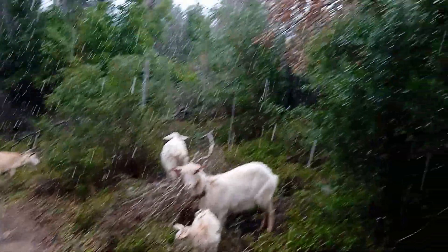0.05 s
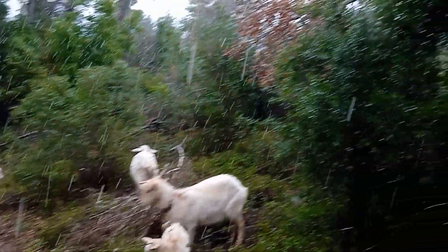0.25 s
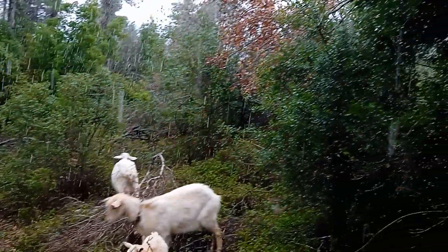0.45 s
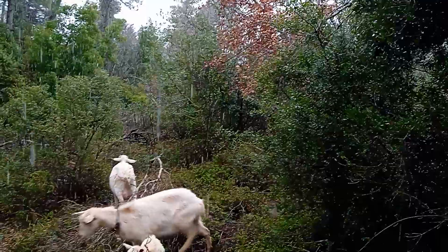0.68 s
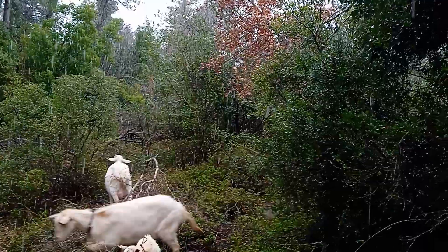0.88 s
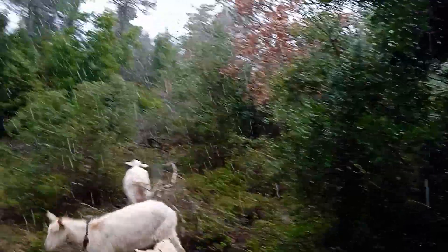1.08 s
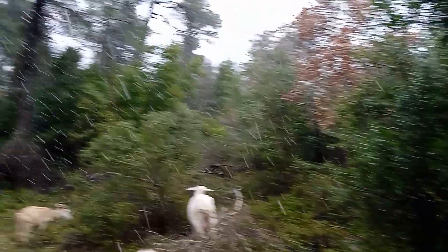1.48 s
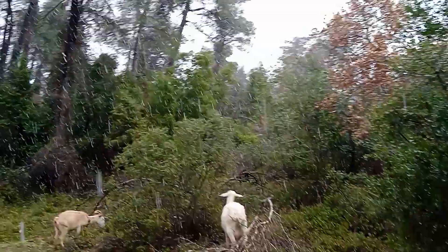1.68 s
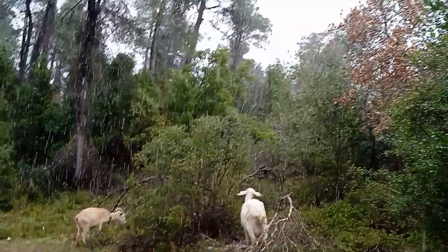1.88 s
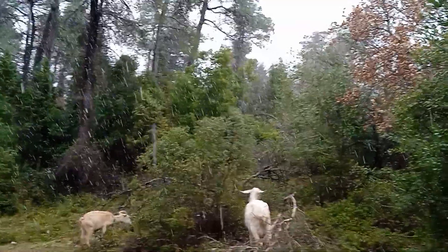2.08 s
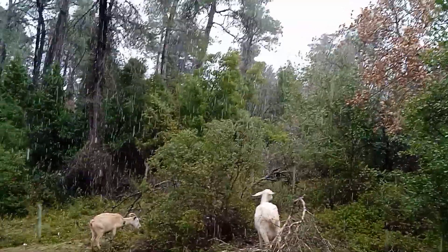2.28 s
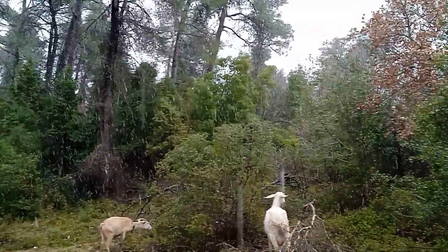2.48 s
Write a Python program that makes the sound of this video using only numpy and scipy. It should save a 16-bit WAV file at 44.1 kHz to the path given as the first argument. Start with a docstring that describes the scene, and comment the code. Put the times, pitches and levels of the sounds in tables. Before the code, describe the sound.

A goat's sheet-metal bell clanks irregularly near the microphone, joined by a higher bell and fainter ones. Outdoors, under lightly pattering drops, the goats rustle the brush, followed by hoof taps, a scuffing step and snapping twigs.

```python
"""Goats browsing at a forest edge, on one microphone in the open air. Over a light patter on the leaves,
a small bell clinks and the nearest goat's sheet-metal bell starts clanking, quick and uneven. A deeper
bell sounds faintly from afar, the animals rustle the brush and a third bell rings on softly. From about
one second in, drops and hooves tap close by, the small bell answers again, one footstep scuffs the
ground and twigs snap."""
import sys
import numpy as np
from scipy import signal
from scipy.fft import rfft, irfft
from scipy.io import wavfile

SR = 44100
rng = np.random.default_rng(int(sys.argv[2]) if len(sys.argv) > 2 else 0)


def dump_mix(stems):
    """Bounce the given channels to the path in sys.argv[1] as a 16-bit WAV at rate SR."""
    frames = np.atleast_2d(stems).T  # one column per channel
    limited = np.clip(frames, -1, 1)  # hard clip at full scale
    pcm = np.round(limited * 32767).astype(np.int16)
    wavfile.write(sys.argv[1], SR, pcm)


N = 116865
TIME = np.arange(N) / SR
FLUTTER, FLUTTER_PER_S = 0.5, 90  # the modes flutter as a bell swings
SCATTER_DB = 3.5  # spread of an upper mode's level from blow to blow


def undb(db):
    """Decibels to gain."""
    return 10 ** (np.asarray(db) / 20)


def colour(x, spectrum):
    """Filter x by a curve of (freq_hz, level_db) points and scale it to rms 1."""
    hz, db = np.array(spectrum).T
    bin_hz = np.maximum(np.arange(len(x) // 2 + 1) * SR / len(x), 1)
    gain = undb(np.interp(np.log(bin_hz), np.log(hz), db))
    shaped = irfft(rfft(x) * gain, len(x))
    return shaped / shaped.std()


def hiss(spectrum):
    """Coloured noise."""
    return colour(rng.standard_normal(N), spectrum)


def grains(spectrum, per_s, spread_db):
    """Dense tiny clicks of unequal size."""
    sizes = undb(spread_db * np.minimum(rng.exponential(size=N), 5))
    hits = rng.random(N) < per_s / SR
    return colour(hits * sizes * rng.choice([-1, 1], N), spectrum)


def swell(start, rise_s, fall_s, hold_s=0):
    """Envelope: linear attack, hold, exponential release."""
    age = TIME - start
    return np.clip(age / rise_s, 0, 1) * np.exp(-np.maximum(age - rise_s - hold_s, 0) / fall_s)


def add(out, start, sound):
    """Mix a sound in at a time."""
    i = max(int(start * SR), 0)
    out[i:i + len(sound)] += sound[:N - i]


def wobble(per_s, t):
    """Smooth random swing of amplitude and phase, as a complex signal with rms near 1."""
    knots = np.arange(int(t[-1] * per_s) + 2) / per_s
    real, imag = rng.standard_normal((2, len(t)))[:, :len(knots)]
    return np.interp(t, knots, real + 1j * imag) * np.sqrt(3 / 4)


def ring(modes, t60_s, rise_s=0.0015, scatter_db=0, flutter=0):
    """Decaying (pitch_hz, level_db) modes; each blow lands elsewhere, so detunes and can reweight them."""
    out, t = 0, TIME[:SR // 2]
    for hz, db in modes:
        gain = undb(db + scatter_db * rng.standard_normal())
        swing = 1 + flutter * wobble(FLUTTER_PER_S, t)
        detuned_hz = hz * (1 + 0.0035 * rng.standard_normal())
        out = out + np.imag(gain * swing * np.exp(2j * np.pi * (detuned_hz * t + rng.random())))
    return out * np.exp(-np.log(1000) * t / t60_s) * (1 - np.exp(-(t / rise_s) ** 2))


def soft_bell(blows, hz, t60_s):
    """One bell mode ringing on after each (start_s, level_db) blow."""
    out = np.zeros(N)
    for start, db in blows:
        add(out, start, undb(db) * ring([(hz, 0)], t60_s))
    return out


def leaf_patter():
    """Fine patter on the foliage over soft air noise, rising and falling together."""
    # spectrum of patter and air: freq_hz, level_db
    spectrum = [(25, -34), (70, -3), (170, -3), (3800, -10), (6300, -6.5), (9500, -21.5), (15000, -15.5)]
    # their loudness contour: time_s, level_db
    contour = [(.1, -64.5), (.35, -59), (.75, -58.5), (1.16, -64.5), (1.4, -61), (1.8, -68), (2.28, -69),
               (2.45, -65), (2.65, -68.5)]
    level = undb(np.interp(TIME, *np.array(contour).T))
    return level * (0.61 * hiss(spectrum) + 0.56 * grains(spectrum, per_s=1100, spread_db=6))


def small_bell():
    """A smaller, higher bell: each blow is a dry clink with a weak hum and bright upper modes."""
    # clapper blows: start_s, level_db, upper_relative_db, pitch_hz
    blows = [(0.097, -44, -28, 2390), (0.203, -41, -21, 2435), (1.170, -38.5, -31, 2150),
             (1.262, -35.5, -23, 2138), (1.413, -31.5, -5, 2118), (1.508, -28, -3.5, 2182),
             (1.645, -32.5, -11, 1993), (1.831, -34, -12, 2103), (2.136, -36, -16, 2113),
             (2.419, -33, -4, 2030), (2.545, -40.5, -11, 2056)]
    # upper modes: pitch_hz, level_db
    modes = [(5120, -19), (6600, -15), (7950, -21), (9100, -21), (10650, -25), (14900, -25)]
    out = np.zeros(N)
    for start, db, upper_db, hz in blows:
        clank = ring([(hz, 0)], t60_s=0.03, rise_s=0.00092)
        hum = ring([(max(hz, 2136), -11)], t60_s=0.14, rise_s=0.0013, flutter=2 * FLUTTER)
        upper = ring(modes, t60_s=0.094, rise_s=0.00092, scatter_db=SCATTER_DB, flutter=FLUTTER)
        add(out, start, undb(db) * (clank + hum + undb(upper_db) * upper))
    return out


def near_hum(t, t60_s, glancing, chatter_per_s):
    """The near bell's lowest mode: the clapper pulls it flat, chatters, then rests and chokes it."""
    hum_hz, sag_hz, chatter_flat_hz = 1738, 63.5, 70
    rise_s, chatter_s, choke_s, free_t60_s = 0.0021, 0.024, 0.13, 0.12
    chatter = np.exp(-t / chatter_s - 2j * np.pi * chatter_flat_hz * t) * wobble(chatter_per_s, t)
    # on a choked blow the clapper stays pressed to the wall and holds the hum flat for longer
    contact_s = 0.0035 + 0.025 * max(1 - t60_s / free_t60_s, 0)
    hz = hum_hz - sag_hz * np.exp(-t / contact_s)
    fade = np.exp(-np.log(1000) * t / t60_s) * (1 + 0.16 * wobble(FLUTTER_PER_S, t))
    tone = np.imag((fade + 0.5 * glancing * chatter) * np.exp(2j * np.pi * np.cumsum(hz) / SR))
    return tone * (1 - np.exp(-(t / rise_s) ** 2)) * np.exp(-(t / choke_s) ** 4)


def near_bell():
    """The sheet-metal bell by the microphone: each blow ticks, buzzes the rim and restarts the ring."""
    # clapper blows: start_s, hum_db, hum_t60_s, middle_db, top_db
    blows = [(0.134,-29,0.16,-57.5,-53.5), (.213,-30.5,0.31,-61,-53.5), (.236,-20.5,0.19,-41,-45),
             (.277,-25,0.17,-38.5,-48.5), (0.312,-24,0.18,-46,-51.5), (.345,-33,0.25,-43,-50.5),
             (0.412,-24,0.17,-48,-55), (0.451,-30,0.15,-45,-53), (.515,-24.5,0.14,-42,-48.5),
             (.551,-14.5,0.15,-38,-45.5), (.595,-36,0.13,-40.5,-51.5), (.64,-25,.18,-42.5,-52),
             (.674,-20,.04,-45,-49), (.688,-36,0.45,-51,-53), (.743,-33,0.19,-37,-55.5),
             (.779,-26.5,0.047,-45.5,-51), (.835,-26.5,0.075,-53.5,-51.5), (0.877,-29.5,0.15,-48.5,-52),
             (.944,-28,0.16,-43,-49.5), (.996,-27,0.29,-49.5,-56), (1.038,-28.5,0.14,-45.5,-51),
             (1.134,-33,.27,-67,-64.5), (1.184,-55,0.4,-42.5,-51.5), (1.286,-31.5,0.24,-53.5,-75),
             (1.308,-27,0.14,-44,-45), (1.343,-29,0.072,-52.5,-55), (1.433,-42.5,0.29,-52,-58),
             (1.529,-31.5,0.13,-51,-50.5), (1.556,-32.5,.41,-50.5,-53), (1.59,-21,0.087,-41.5,-49.5),
             (1.608,-30.5,.19,-55,-55), (1.695,-34.5,0.2,-48.5,-55), (1.711,-29.5,0.21,-43,-56.5),
             (1.875,-17,0.021,-43.5,-51), (1.888,-29,0.19,-46.5,-56), (2.021,-29.5,0.21,-49.5,-53),
             (2.169,-24,.13,-48,-53.5), (2.319,-29,.13,-58,-66.5), (2.3502,-30,0.31,-53,-57.5)]
    # three groups of upper modes, mostly split pairs: pitch_hz, level_db
    middle = [(4724, 0), (4810, -2.5)]
    high = [(8430, 0), (8790, -2)]
    top = [(12970, -1), (13345, -1), (14420, -10), (15120, -4), (15600, -12)]
    # the high pair gets louder as the goat turns: time_s, relative_to_top_db
    turn = [(1.3, -10), (1.35, 2)]
    # spectra of the clapper's tick and the rim's dense cluster of modes: freq_hz, level_db
    tick_spectrum = [(1000, -20.5), (1900, 22), (3800, -10), (5500, 9), (8000, -4.5)]
    rim_spectrum = [(6000, -19), (12300, -20), (13300, 2), (13800, -8), (15300, 0), (16300, -14)]
    # hard clicks where the clapper hits the rim squarely: start_s, level_db
    square_hits = [(0.515, -36), (0.7438, -36), (1.587, -36.5), (1.875, -43), (2.169, -45)]
    tick_relative_db, tick_s, buzz_relative_db, buzz_s = -11.5, 0.013, -7.5, 0.028
    hum_stop_s, upper_stop_s, chatter_per_s = 0.00059, 0.0082, 170
    out, ticks, buzz = np.zeros((3, N))
    t = TIME[:SR // 2]
    gaps = np.diff([row[0] for row in blows] + [N / SR])
    for (start, hum_db, hum_t60_s, middle_db, top_db), gap in zip(blows, gaps):
        # glancing blows favour the middle modes and chatter most
        glancing = min(undb((middle_db - hum_db) / 2), 1)
        hum = undb(hum_db) * near_hum(t, hum_t60_s, glancing, chatter_per_s)
        high_db = top_db + np.interp(start, *np.array(turn).T)
        groups = [(middle, middle_db, 0.34), (high, high_db, 0.28), (top, top_db, 0.14)]
        upper = sum(undb(db) * ring(modes, t60_s, scatter_db=SCATTER_DB, flutter=FLUTTER)
                    for modes, db, t60_s in groups)
        late = np.maximum(t - gap, 0)  # time since the next blow, which stops this ring
        add(out, start, hum * np.exp(-late / hum_stop_s) + upper * np.exp(-late / upper_stop_s))
        add(ticks, start, undb(tick_relative_db + (hum_db + top_db) / 2) * np.exp(-t / tick_s))
        rattle = np.abs(wobble(chatter_per_s, t))
        add(buzz, start, undb(top_db + buzz_relative_db) * np.exp(-t / buzz_s) * rattle)
    clicks = sum(undb(db) * swell(start, rise_s=0.00059, fall_s=0.0028) for start, db in square_hits)
    return out + ticks * hiss(tick_spectrum) + (buzz + clicks) * hiss(rim_spectrum)


def far_bell():
    """A deeper bell, struck twice, faint with distance."""
    # clapper blows: start_s, level_db
    blows = [(.155, -63.5), (1.43, -58.5)]
    return soft_bell(blows, hz=657, t60_s=0.53)


def brush_rustle():
    """Leaves crackle in bursts as the goats push through the brush."""
    # pushes: start_s, level_db
    pushes = [(0.219, -49), (0.336, -46), (0.463, -46), (0.576, -45), (0.693, -42), (0.841, -48),
              (1.72, -52), (2.476, -59)]
    # spectrum of the leaves: freq_hz, level_db
    spectrum = [(400, -31.5), (2200, 6), (3800, -16), (6000, 5), (8600, -14.5), (11500, -15), (15000, -28)]
    bursts = sum(undb(db) * swell(start, rise_s=0.003, fall_s=0.022) for start, db in pushes)
    return bursts * grains(spectrum, per_s=5000, spread_db=4)


def third_bell():
    """A clear, long-ringing bell, nudged softly."""
    # nudges: start_s, level_db
    blows = [(.236, -37), (.744, -45.5), (.944, -44.5), (1.185, -43), (1.69, -46)]
    return soft_bell(blows, hz=2036, t60_s=0.5)


def pings():
    """Stray glancing touches on a bell, each sounding a single high partial."""
    # touches: start_s, level_db, pitch_hz
    touches = [(.278, -41, 5140), (0.427, -52, 9340), (.425, -37, 15000)]
    out = np.zeros(N)
    for start, db, hz in touches:
        add(out, start, undb(db) * ring([(hz, 0)], t60_s=0.098, rise_s=0.00092, flutter=FLUTTER))
    return out


def taps():
    """Drops and hooves land close by: hollow, gritty knocks that last only a few cycles."""
    # impacts: start_s, level_db, pitch_hz
    impacts = [(0.982, -43.5, 735), (1.049, -43, 1040), (1.23, -54.5, 181), (1.396, -49.5, 163.6),
               (1.672, -56.5, 155), (2.121, -39.5, 662)]
    rise_s, decay_cycles = 0.00084, 2.6
    out, t = np.zeros(N), TIME[:SR // 8]
    for start, db, hz in impacts:
        band = signal.butter(2, [hz / 2, 2 * hz], "band", fs=SR, output="sos")
        grit = signal.sosfilt(band, rng.standard_normal(len(t)))
        knock = np.sin(2 * np.pi * hz * t) + 0.25 * grit / grit.std()
        envelope = (1 - np.exp(-t / rise_s)) * np.exp(-t * hz / decay_cycles)
        add(out, start, undb(db) * knock * envelope)
    return out


def footstep():
    """A sole scuffs the litter, then the weight crunches into soft ground."""
    # spectra of the litter and the ground: freq_hz, level_db
    litter = [(150, -25), (750, -3.5), (12000, -20.5)]
    ground = [(40, -46), (150, -3), (3000, -36)]
    scuff = undb(-56.5) * swell(1.212, rise_s=0.004, hold_s=0.075, fall_s=0.15)
    weight = undb(-53.5) * swell(1.275, rise_s=0.0096, hold_s=0.075, fall_s=0.035)
    return (scuff * grains(litter, per_s=1100, spread_db=1.5)
            + weight * grains(ground, per_s=500, spread_db=1.5))


def twig_snaps():
    """Single twigs break, each with a very short burst of noise."""
    # breaks: start_s, level_db
    snaps = [(1.587, -44), (2.304, -49), (2.507, -51.5), (2.579, -52)]
    # spectrum of a snap: freq_hz, level_db
    spectrum = [(400, -21), (1200, -2.5), (3600, -1.5), (9000, -21)]
    bursts = sum(undb(db) * swell(start, rise_s=0.00059, fall_s=0.0018) for start, db in snaps)
    return bursts * hiss(spectrum)


def scene():
    """The forest edge in the open air, on one microphone."""
    bells = small_bell() + near_bell() + far_bell() + third_bell() + pings()
    return (leaf_patter() + bells + brush_rustle() + taps() + footstep() + twig_snaps())[None]


def record(dry):
    """The recorder cuts the top with a steep low-pass."""
    cutoff_hz = 16100
    return signal.sosfilt(signal.ellip(10, 0.2, 70, cutoff_hz, fs=SR, output="sos"), dry)


dry = scene()
out = record(dry)
dump_mix(out)
```